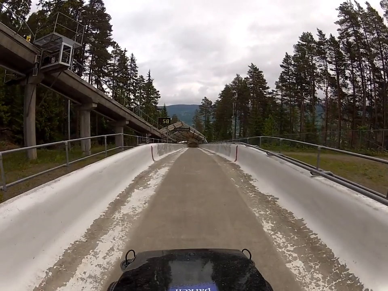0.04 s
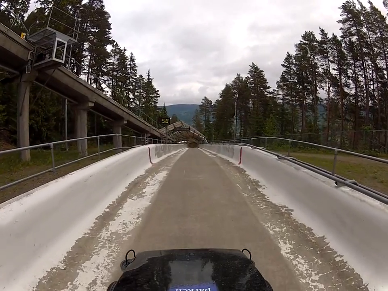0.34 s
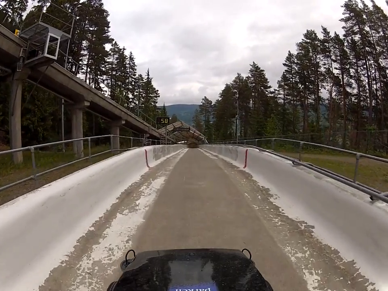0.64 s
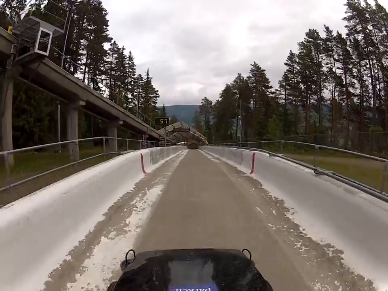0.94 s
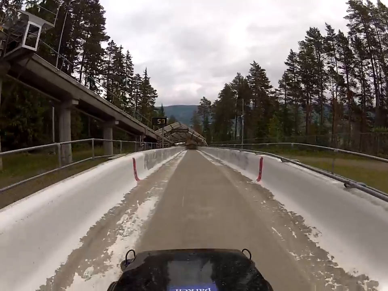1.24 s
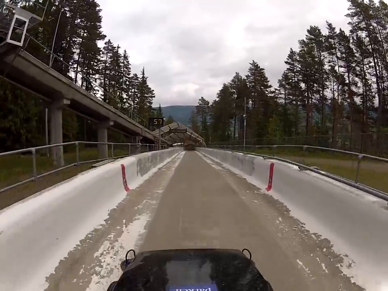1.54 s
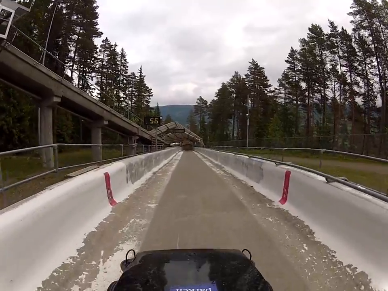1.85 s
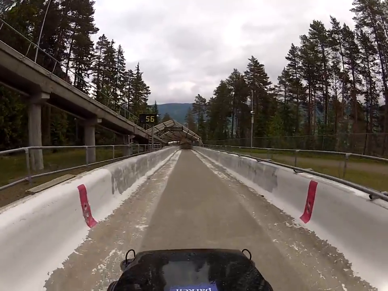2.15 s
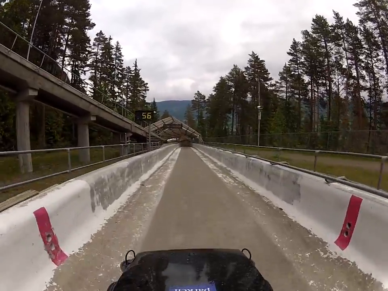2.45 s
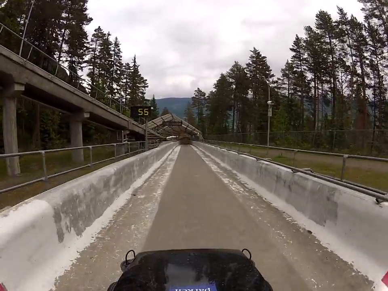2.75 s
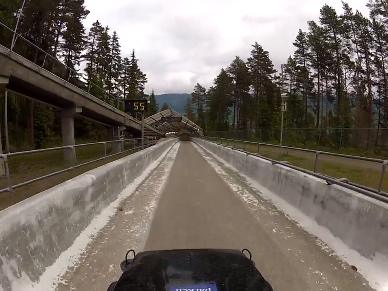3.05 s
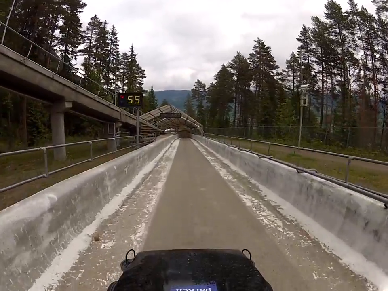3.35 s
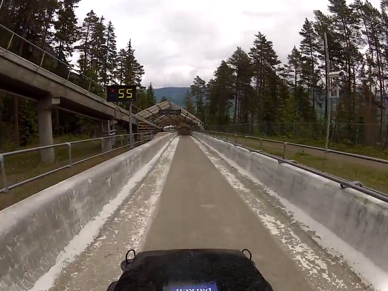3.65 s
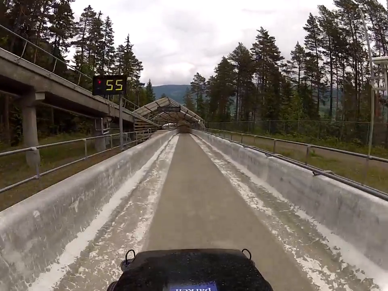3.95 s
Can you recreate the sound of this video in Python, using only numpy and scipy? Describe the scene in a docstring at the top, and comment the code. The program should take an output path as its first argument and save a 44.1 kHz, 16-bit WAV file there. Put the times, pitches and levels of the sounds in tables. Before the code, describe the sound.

Low rumble of a wheeled bobsled gathering speed on concrete, its loose metal fittings rattling.

```python
"""A wheeled bobsled gathers speed down a concrete track, heard from on board.
Its hull booms near 60 Hz in uneven swells and now and then hums. The wheels rumble and grind,
making the hull and panels ring, while air hisses past. Bumps knock the sled and shake loose
fittings, metal parts chink and clack, and grit cracks under the wheels.
The recorder adds a thin fizz that follows the sound."""
import sys
import numpy as np
from scipy import signal
from scipy.fft import rfft, irfft, next_fast_len
from scipy.io import wavfile
from scipy.ndimage import uniform_filter1d, map_coordinates

SR = 44100
rng = np.random.default_rng(int(sys.argv[2]) if len(sys.argv) > 2 else 0)


def store_pcm(level_fs):
    """Save levels as 16-bit WAV."""
    pcm = np.round(np.clip(level_fs, -1, 1) * 32767).astype(np.int16)
    wavfile.write(sys.argv[1], SR, np.atleast_2d(pcm).T)


N = 176400

# swells of the hull's boom (t/s, level/dB); all levels are relative
BOOM_SWELLS = [(0, -19), (0.048, -66), (0.168, -21), (0.269, -55.5), (0.424, -17.5), (0.484, -41),
               (0.53, -21), (0.584, -38.5), (0.608, -20), (0.64, -33), (0.69, -21.5), (0.721, -42.5),
               (0.771, -19.5), (0.831, -41), (0.9, -13.5), (0.982, -34), (1.012, -21.5), (1.132, -17),
               (1.191, -28), (1.226, -15), (1.338, -42), (1.389, -19), (1.428, -28.5), (1.509, -19),
               (1.549, -34), (1.58, -23), (1.628, -37), (1.738, -18.5), (1.798, -36), (1.88, -13),
               (1.942, -35.5), (1.979, -14.5), (2.02, -25), (2.062, -16), (2.09, -25), (2.12, -15),
               (2.232, -28), (2.258, -16), (2.307, -36.5), (2.45, -19), (2.54, -23.5), (2.661, -13.5),
               (2.759, -36), (2.819, -16.5), (2.888, -37.5), (2.96, -21), (3.011, -57), (3.232, -16.5),
               (3.27, -39.5), (3.41, -14), (3.47, -16.5), (3.502, -36.5), (3.57, -7), (3.773, -28),
               (3.904, -14), (3.932, -36), (4, -14)]
# pitch of the boom (t/s, f/Hz)
BOOM_PITCHES = [(0,56),(.45,62),(.95,65.5),(1.25,59.5),(1.8,63.5),(2.2,63),(2.6,56.5),(3.3,59.5),(4,60)]
# strength of the rumble, rising with speed (t/s, level/dB)
RUMBLE_LEVELS = [(0,-48.5),(.35,-44.5),(.68,-44),(.87,-41.5),(1.75,-40.5),(2.6,-37.5),(3.4,-37),(3.66,-33),(3.82,-36.5),(4,-31.5)]
# dull tone of wheels and wind (f/Hz, level/dB)
RUMBLE_SPECTRUM = [(20,-15.5),(60,4),(105,0),(165,-2.5),(215,-10.5),(300,-14.5),(400,-21),(500,-19.5),(560,-34.5),(900,-46.5),(2000,-72)]
# the hull's low modes: pitches it rings at (f/Hz, width/Hz, level/dB)
HULL_MODES = [(242.9,18.3,0),(311,15,-5.5),(335.2,25,0),(379,6,-8),(449.8,12.5,1)]
# strength of the wheels' grind (t/s, level/dB)
GRIND_LEVELS = [(0,-58),(.7,-57.5),(.9,-55),(1.7,-54),(2.2,-52),(2.45,-53),(2.6,-50.5),(3.35,-51),(3.48,-46.5),(3.6,-40.5),(3.78,-47.5),(3.9,-47),(4,-41.5)]
# ringing of the panels (f/Hz, width/Hz, level/dB)
PANEL_MODES = [(736,20,-2),(759,23,-9),(953,60,-6.5),(1242,17,-10.5),(1283.6,29.5,1.5),(1322.4,63,-2.5),(1471,39,-1.5),(2260,233,-12.5),(2544,150,-20.5)]
# gritty noise of the concrete (f/Hz, level/dB)
GRIT_SPECTRUM = [(550,-17),(850,-6),(1400,6.5),(1650,-7.5),(2100,3),(2750,-11),(3000,-20.5),(4100,-15),(5400,-22.5),(6000,-34.5),(15000,-43.5)]
# ringing of the loose fittings (f/Hz, width/Hz, level/dB)
FITTING_MODES = [(1305,52,2),(1570,130,-3),(1830,150,-3),(2223,63,2.5),(2334,95,4),(2550,130,0),(2639,59,-3.5),(3140,32,-13.5),(3535,130,-7.5),(3820,48,-9),(4200,56,-11.5)]
# hiss of passing air (f/Hz, level/dB)
AIR_SPECTRUM = [(300,0),(2500,3.5),(3100,-5.5),(3700,0.5),(5900,-15.5),(6800,-13.5),(15000,-23)]
# jolts to the fittings (t/s, level/dB, length/s, brightness/dB per octave)
RATTLE_BURSTS = [(0.167,-59,0.035,1.5),(0.749,-54,0.0098,0),(0.798,-51.5,0.0055,-4.5),(0.857,-53.5,0.02,-1.5),(1.024,-58.5,0.027,2),(1.212,-55,0.0048,-1.5),(1.312,-59,0.014,1.5),(1.492,-47.5,0.005,-1),(1.75,-55.5,0.022,5),(1.794,-54,0.024,3),(2.063,-53.5,0.013,2),(2.154,-58,.015,-2.5),(2.53,-51,0.034,4),(2.567,-50.5,.012,1.5),(2.592,-46,0.01,-4.5),(2.625,-48,0.023,-5),(2.683,-52.5,0.02,1.5),(2.955,-52.5,0.018,4),(3.099,-46.5,0.011,-4.5),(3.49,-48,0.017,4.5),(3.533,-48,0.014,2.5),(3.574,-35,.022,1.5),(3.605,-40,0.024,0),(3.644,-47,0.037,1.5),(3.697,-48,0.037,2.5),(3.947,-46,0.026,5)]
# wheels hitting rough spots (t/s, level/dB)
KNOCK_HITS = [(0.191,-45),(2.156,-37.5),(2.809,-35.5),(3.1,-39.5),(3.577,-24)]
# tone of a wheel's blow (f/Hz, level/dB)
KNOCK_SPECTRUM = [(700,-9),(1300,5.5),(2200,-11),(4000,-19.5)]
# peaks of the hull's hum (t/s, level/dB)
HUM_SWELLS = [(0.876,-40.5),(1.27,-47),(1.568,-39),(2.73,-38.5),(3.59,-41)]
# chinks of a loose metal ring (t/s, level/dB)
CHINK_HITS = [(0.911,-66),(0.937,-63.5),(.982,-57.5),(1.024,-60.5)]
# its one tone (f/Hz, level/dB, time to fade 60 dB/s)
CHINK_TONES = [(4150,0.5,0.091)]
# clacks of larger metal parts (t/s, level/dB, f/Hz)
CLACK_HITS = [(1.035,-52.5,2735),(1.496,-50.5,2705),(3.1,-42,2384)]
# their tones (multiple of f, level/dB, time to fade 60 dB/s)
CLACK_TONES = [(0.998,0.5,0.18),(1.4,-7,0.057)]
# grit cracking (t/s, level/dB)
TICK_HITS = [(2.153,-55),(2.563,-52.5),(3.576,-55)]
# its bright ringing (f/Hz, width/Hz, level/dB)
CRACK_MODES = [(5360,340,0.5),(6640,350,-4.5)]
# how much of each frequency feeds the fizz (f/Hz, level/dB)
FIZZ_FEED = [(20,-62),(60,-45.5),(250,-34),(455,-30),(1280,-20),(2300,-12.5),(3500,-8),(5400,-1),(6500,-46.5)]
# the recorder's tone (f/Hz, level/dB)
RECORDER_TONE = [(20,2.5),(7000,-5),(9500,-3.5),(12000,1.5),(14500,-6),(15300,-9)]

GRAINS_PER_S, GRAIN_SPREAD_DB = 2500, 5


def amp(db):
    """Turn decibels into a gain."""
    return 10 ** (np.asarray(db) / 20)


def unit(x):
    """Scale x to an average power of 1."""
    return x / np.sqrt(np.mean(x ** 2) + 1e-20)


def curve(rows):
    """Join (time, value) rows with straight lines, one value per sample."""
    return np.interp(np.arange(N) / SR, *np.transpose(rows))


def wobble(rate):
    """A smooth curve through `rate` random points a second."""
    points = rng.standard_normal(int(N * rate / SR) + 4)
    return map_coordinates(points, [np.arange(N) * rate / SR])


def filtered(x, response):
    """Scale each frequency f in x by response(f)."""
    size = next_fast_len(len(x) + SR // 4)
    return irfft(rfft(x, size) * response(np.fft.rfftfreq(size, 1 / SR)), size)[:len(x)]


def coloured(x, spectrum):
    """Shape the tone of x with (f/Hz, level/dB) rows."""
    hz, db = np.transpose(spectrum)
    return filtered(x, lambda f: amp(np.interp(np.log(f + 1), np.log(hz), db)))


def ring(x, modes):
    """Make x ring by keeping a narrow band around each mode."""
    def band(f, hz, width):
        return 1j * f * width / (hz * hz - f * f + 1j * f * width)
    return filtered(x, lambda f: sum(amp(db) * band(f, hz, w) * band(f, hz, 5 * w)
                                     for hz, w, db in modes))


def grains(rate, spread_db, size=N):
    """Tiny random impacts of uneven size, about `rate` a second."""
    sizes = rng.choice([-1, 1], size) * amp(spread_db * rng.standard_normal(size))
    return unit(sizes * (rng.random(size) < rate / SR))


def struck(strikes, tones, blur_hz=26):
    """Struck metal rings with fading tones, never twice quite alike."""
    out, t = np.zeros(N + SR), np.arange(SR // 4) / SR
    for start, db in strikes:
        for hz, level, fade_s in tones:
            drift = np.cumsum(rng.standard_normal(len(t))) * np.sqrt(2 * np.pi * blur_hz / SR)
            fade = amp(db + level + rng.standard_normal() - 60 * t / fade_s)
            out[round(start * SR):][:len(t)] += fade * np.sin(2 * np.pi * hz * t + drift)
    return out[:N]


def boom(wander_hz=2.607, gain_db=-1.26):
    """The hull's lowest note swells and sinks, its pitch wandering."""
    pitch = curve(BOOM_PITCHES) + wander_hz * wobble(16)
    swell = curve([(time, amp(db + gain_db)) for time, db in BOOM_SWELLS])
    swell = uniform_filter1d(swell, size=500)  # round off the corners
    return np.sqrt(2) * swell * np.sin(2 * np.pi * np.cumsum(pitch) / SR)


def rumble(broad_db=-1, hull_db=-3.5):
    """Wheels and wind shake the hull harder as speed builds."""
    broad = unit(coloured(rng.standard_normal(N), RUMBLE_SPECTRUM))
    hull = unit(ring(rng.standard_normal(N), HULL_MODES))
    return amp(curve(RUMBLE_LEVELS)) * (amp(broad_db) * broad + amp(hull_db) * hull)


def grind(grit_db=-5.5, judder_db=1.2, gain_db=-0.5):
    """Grains of concrete under the wheels set the panels ringing."""
    panels = unit(ring(grains(GRAINS_PER_S, GRAIN_SPREAD_DB), PANEL_MODES))
    grit = unit(coloured(rng.standard_normal(N), GRIT_SPECTRUM))
    level = curve(GRIND_LEVELS) + judder_db * wobble(70) + gain_db
    return amp(level) * (panels + amp(grit_db) * grit)


def chatter(gain_db=-17.5, swing_db=7):
    """The rough ride keeps the fittings trembling in small, uneven fits."""
    shake = unit(ring(grains(GRAINS_PER_S, GRAIN_SPREAD_DB), FITTING_MODES))
    level = curve(GRIND_LEVELS) + gain_db + swing_db * np.tanh(wobble(24))
    return amp(level) * shake


def air(gain_db=-64):
    """Air streams past with a steady hiss."""
    return amp(gain_db) * unit(coloured(rng.standard_normal(N), AIR_SPECTRUM))


def rattles(hits_per_s=2500, settle_s=0.012, vary_db=2):
    """Each jolt strikes the fittings, which rattle for a moment, then settle."""
    out, t = np.zeros(N + SR), np.arange(SR // 8) / SR
    click = 1. * (t == 0)
    for start, db, length, brightness in RATTLE_BURSTS:
        modes = [(hz, width, level + brightness * np.log2(hz / 2400) + vary_db * rng.standard_normal())
                 for hz, width, level in FITTING_MODES]
        hits = grains(hits_per_s, spread_db=1.5, size=len(t))
        hits[0] = 8  # a hard first hit
        tone = ring(click, modes)[:1500]  # the sound of one hit
        shake = hits * np.exp(-np.maximum(t - length, 0) / settle_s)
        rattle = signal.fftconvolve(shake, tone / np.linalg.norm(tone))[:len(t)]
        out[round(start * SR):][:len(t)] += amp(db) * rattle
    return out[:N]


def knocks(decay_s=0.003):
    """Short blows from the track ring the panels."""
    out, t = np.zeros(N + SR), np.arange(SR // 8) / SR
    for start, db in KNOCK_HITS:
        blow = coloured(rng.standard_normal(len(t)), KNOCK_SPECTRUM) * np.exp(-t / decay_s)
        knock = ring(blow, PANEL_MODES)
        out[round(start * SR):][:len(t)] += amp(db) * knock / np.abs(knock).max()
    return out[:N]


def hum(pitch_hz=457.3, wander_hz=5.04, half_length_s=0.056):
    """Now and then the wheels shake one note of the hull into a brief hum."""
    t = np.arange(N) / SR
    swell = sum(amp(db) * np.exp(-((t - peak) / half_length_s) ** 2) for peak, db in HUM_SWELLS)
    pitch = pitch_hz + wander_hz * wobble(20)
    return swell * np.sin(2 * np.pi * np.cumsum(pitch) / SR)


def chinks():
    """A small metal ring chinks when it is tossed."""
    return struck(CHINK_HITS, CHINK_TONES)


def clacks():
    """Larger metal parts clack against the frame, each at its own pitch."""
    out = np.zeros(N)
    for start, db, hz in CLACK_HITS:
        tones = [(hz * ratio, level, fade_s) for ratio, level, fade_s in CLACK_TONES]
        out += struck([(start, db)], tones)
    return out


def ticks(decay_s=0.004):
    """Bits of grit crack under the wheels."""
    out, t = np.zeros(N + SR), np.arange(SR // 8) / SR
    for start, db in TICK_HITS:
        crack = ring(rng.standard_normal(len(t)) * np.exp(-t / decay_s), CRACK_MODES)
        out[round(start * SR):][:len(t)] += amp(db) * crack / np.abs(crack).max()
    return out[:N]


def scene():
    """Rolling and jolts come through the sled's body; the air hisses outside."""
    rolling = boom() + rumble() + hum() + grind() + chatter()
    jolts = rattles() + knocks() + clacks() + chinks() + ticks()
    return (rolling + jolts + air())[None]


def record(dry, mirror_hz=12000, top_hz=15300):
    """The recorder adds a faint fizz, shapes the tone and cuts off the highest treble."""
    sound = dry[0]
    # multiplying by a high tone mirrors the sound on both sides of that tone
    high_tone = 2 * np.cos(2 * np.pi * mirror_hz * np.arange(N) / SR)
    fizz = high_tone * coloured(sound, FIZZ_FEED)
    shaped = coloured(sound + fizz, RECORDER_TONE)
    return filtered(shaped, lambda f: f < top_hz)[None]


dry = scene()
out = record(dry)
store_pcm(out)
```